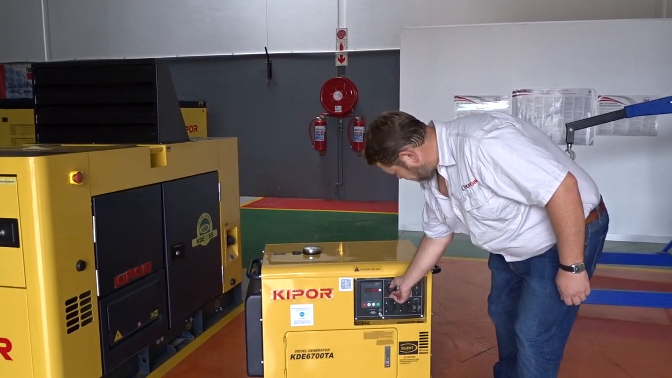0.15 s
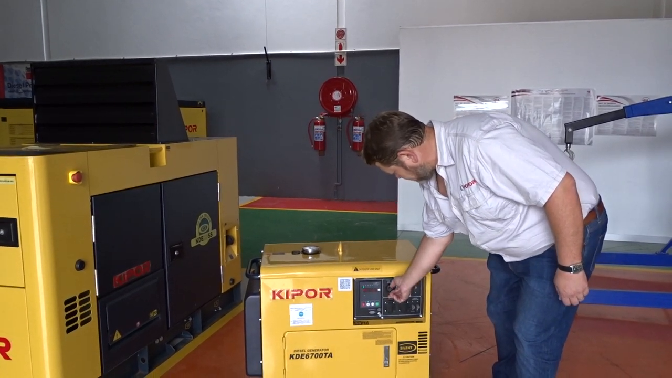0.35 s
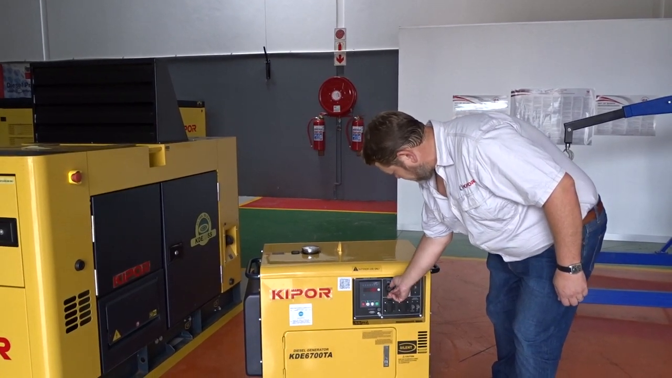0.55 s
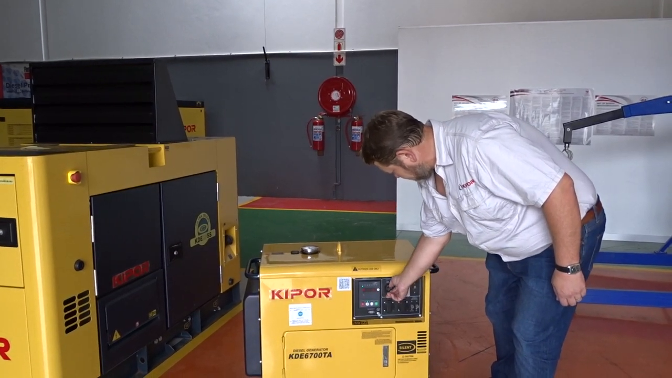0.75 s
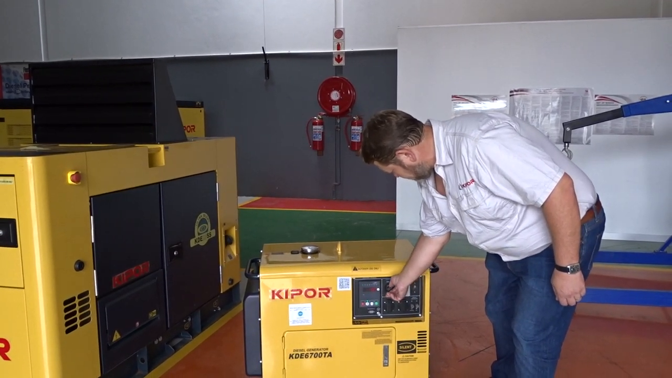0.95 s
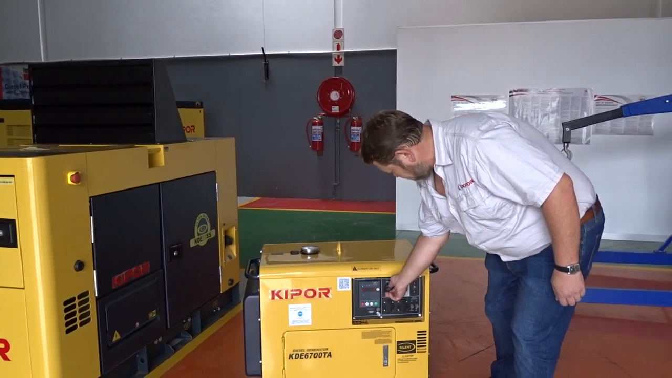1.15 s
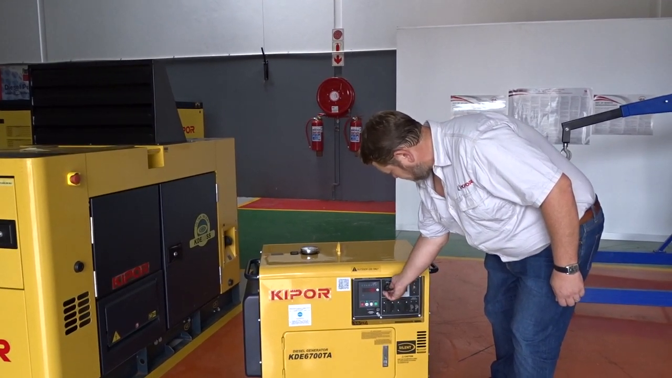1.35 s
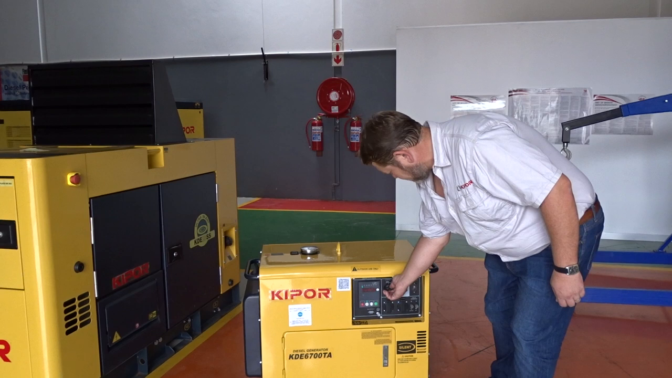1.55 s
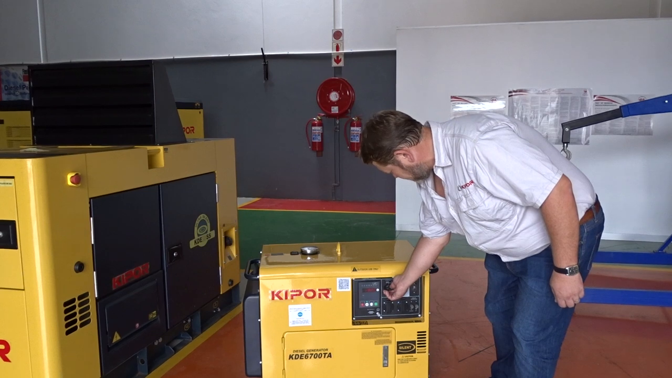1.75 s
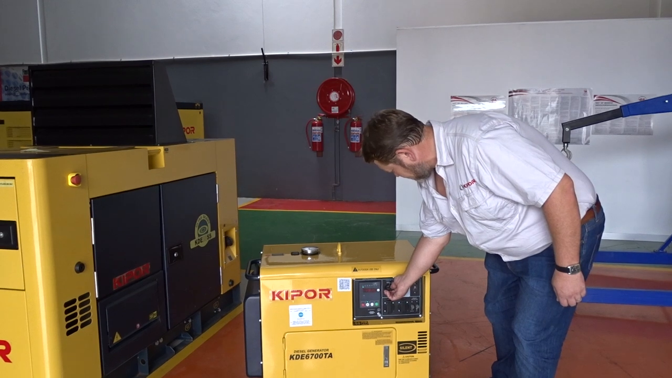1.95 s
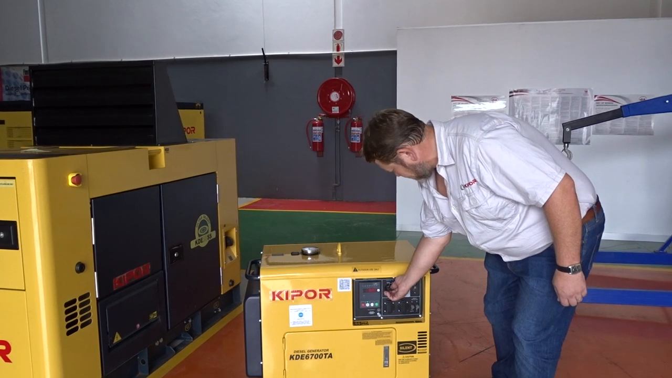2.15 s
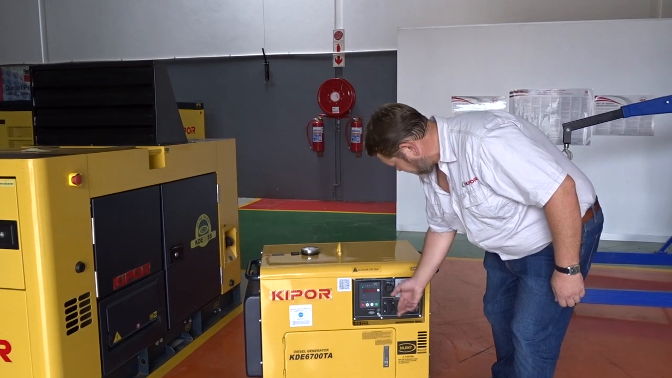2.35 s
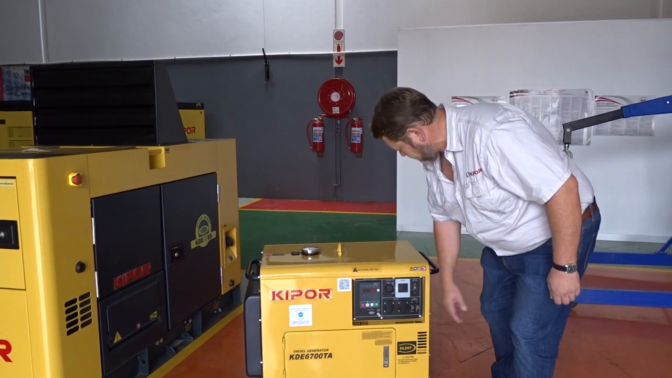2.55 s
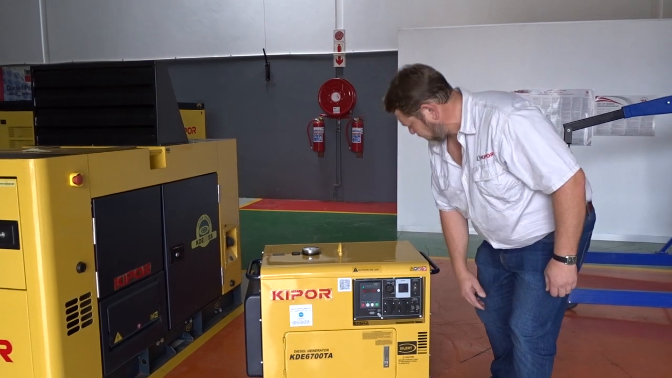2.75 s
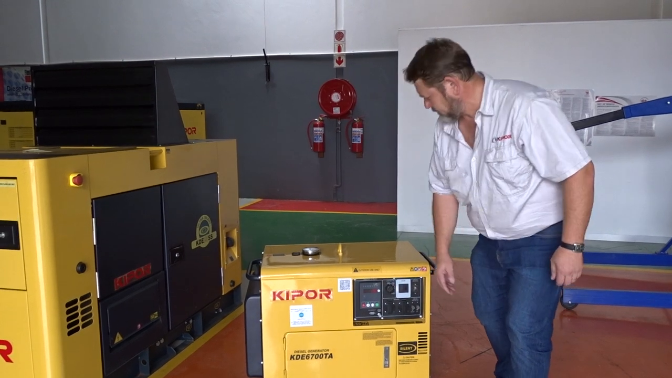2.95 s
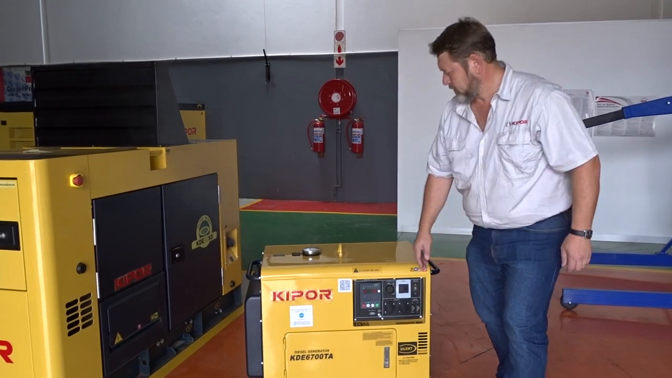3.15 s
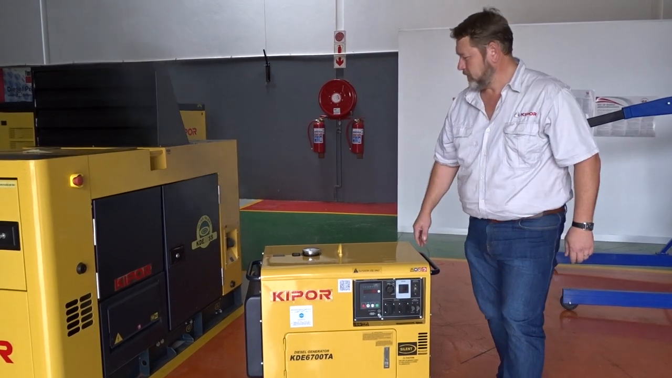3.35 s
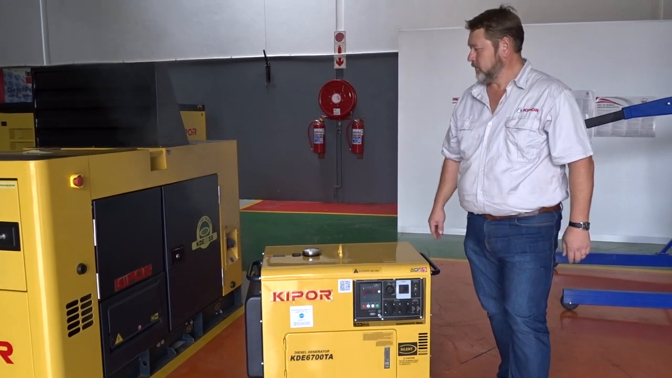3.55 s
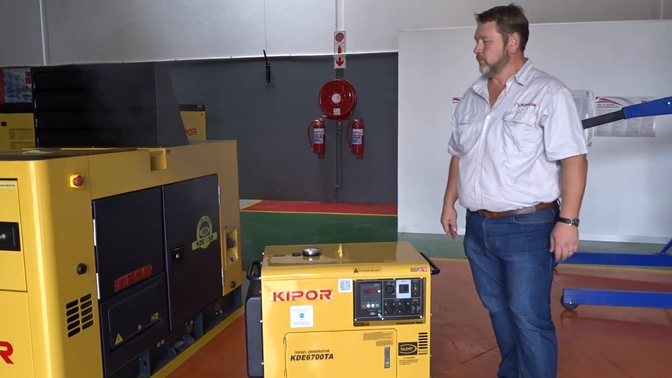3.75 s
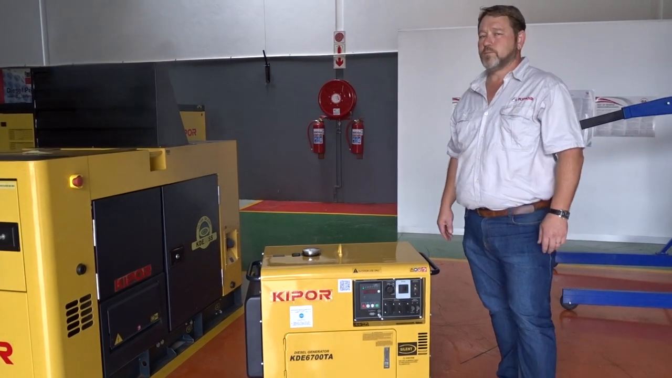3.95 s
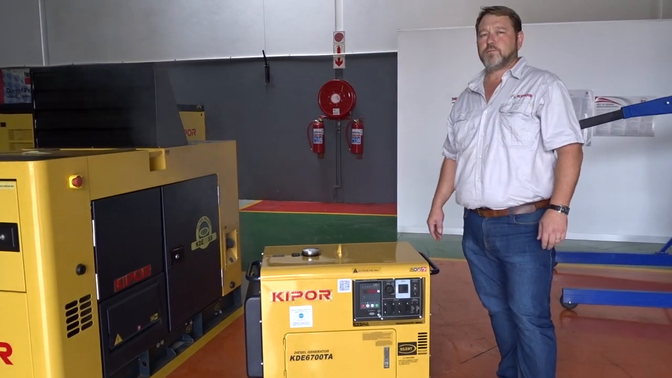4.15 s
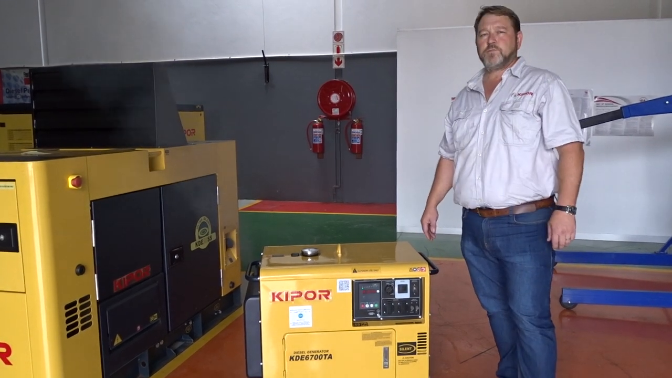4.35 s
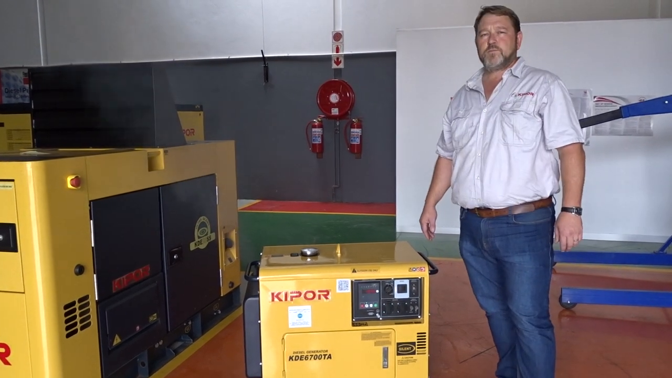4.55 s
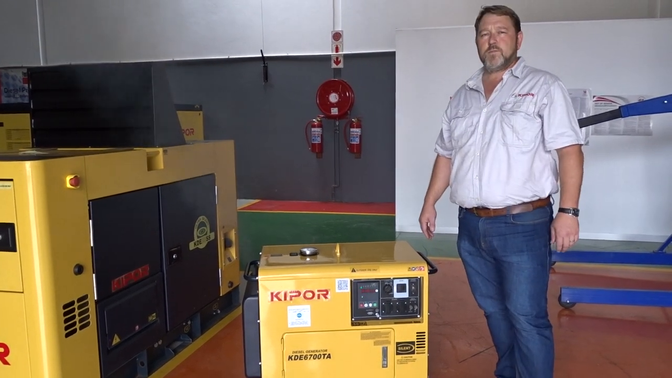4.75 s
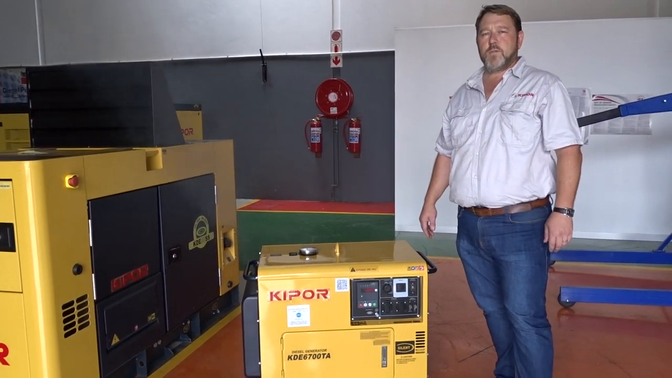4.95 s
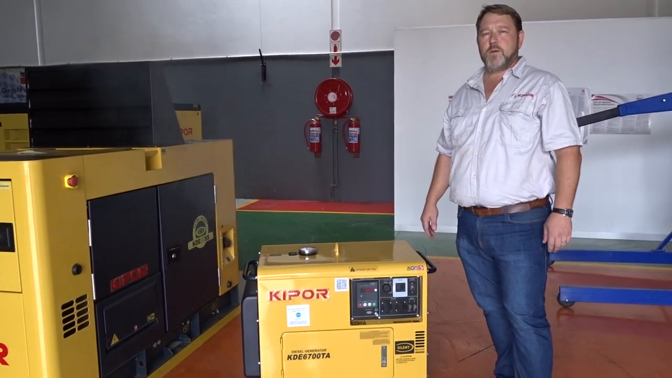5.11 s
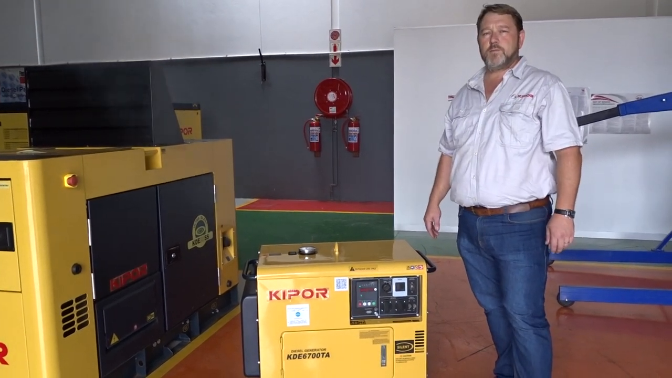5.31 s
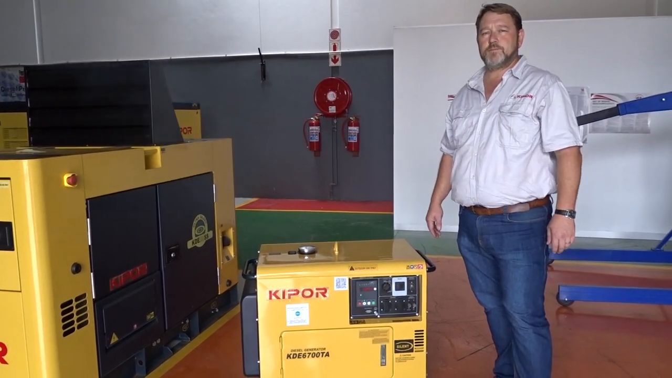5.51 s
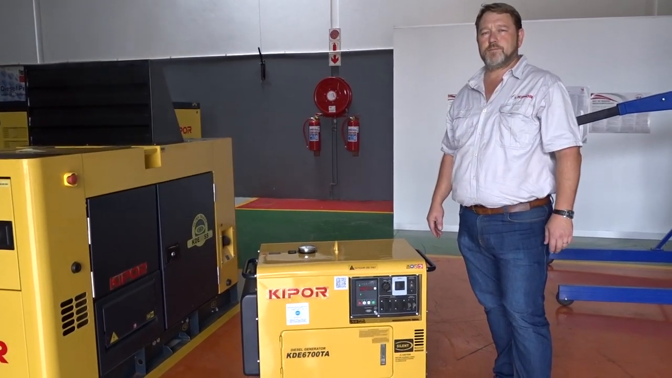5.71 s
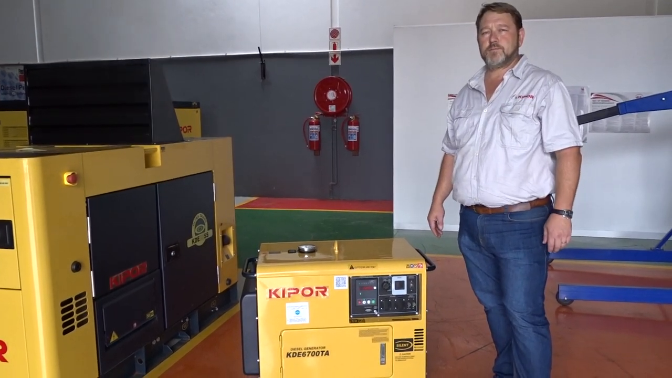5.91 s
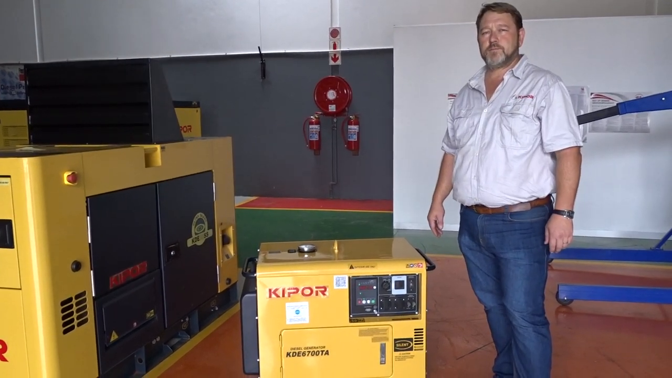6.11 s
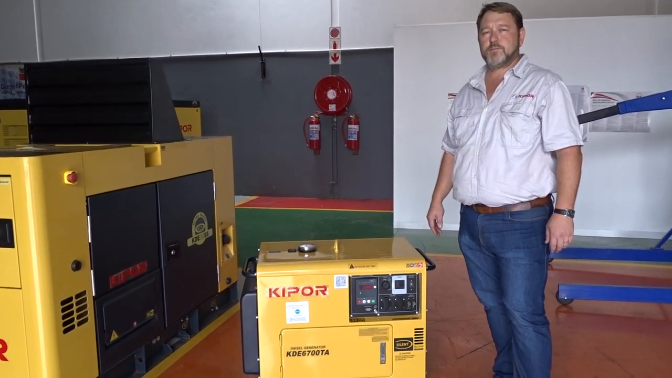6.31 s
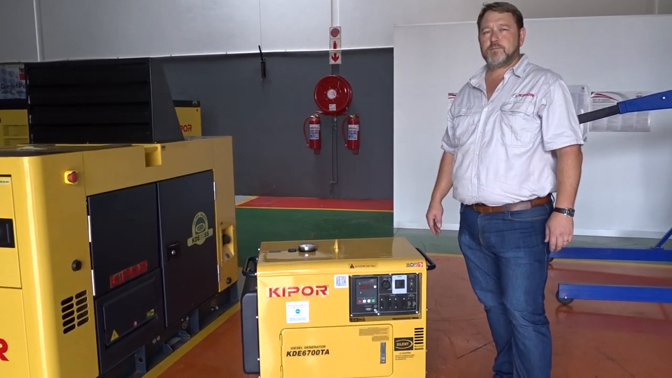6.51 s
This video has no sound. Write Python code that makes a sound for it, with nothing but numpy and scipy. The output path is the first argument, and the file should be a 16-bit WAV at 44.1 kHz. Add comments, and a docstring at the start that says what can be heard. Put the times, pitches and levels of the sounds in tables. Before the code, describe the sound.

A stereo microphone faces a small steel-cased diesel generator indoors. After over a second of near-quiet with a light rub and key clicks, the electric starter bites and rasps on its gear. Heavy first combustion thumps shake the case; separate knocks crowd together as speed climbs, with sheet metal ringing and loose panels slapping. The engine then holds constant speed, droning and rattling, with short wall reflections.

```python
"""In a workshop, the stereo microphone faces a small single-cylinder diesel generator in a steel case.
After a faint squeak and the snap of key contacts, the starter clashes in and grinds on the ring gear.
The engine fires and knocks its way up to speed while its cover buzzes and slaps; it settles at 26 firings
a second, one panel ringing along. Noise through resonances and spectra makes the metal; cosines make the
exhaust hum; filtered noise bursts throw the sound back from the walls."""
import sys
import numpy as np
from scipy import signal
from scipy.fft import rfft, irfft, next_fast_len
from scipy.io import wavfile
from scipy.ndimage import uniform_filter1d

SR = 44100
rng = np.random.default_rng(int(sys.argv[2]) if len(sys.argv) > 2 else 0)


def store_pcm(level_fs):
    """Save levels as 16-bit WAV."""
    pcm = np.round(np.clip(level_fs, -1, 1) * 32767).astype(np.int16)
    wavfile.write(sys.argv[1], SR, np.atleast_2d(pcm).T)


N = 294147
T = np.arange(N) / SR

# engine speed from the first firing until the governor holds it (time [s], rate [firings per second])
SPEED = [(2.058, 5.36), (2.39, 6.458), (3.01, 13.103), (3.43, 16.732), (4.58, 25.363), (4.83, 26.345),
         (5.29, 26.167), (6.67, 26.014)]
FIRED_S = SPEED[0][0]
# fuel rack: well open for the run-up, cut back by the governor, then eased open again
# (time [s], fuel [share of full])
FUEL = [(4.45, 0.76), (4.88, 0.024), (5.35, 0.15), (6.35, 0.17)]
# blows on the block: combustion crack, its ringing on, injector and tappet, piston slap, valves closing
# (place [share of cycle], level [dB], decay [s], growth [power of speed], rise at full fuel [dB])
STROKES = [(0.985, -7.5, 0.009, 0.4, 4), (.02, -10.5, 0.057, -0.54, 8), (.27, -5.5, 0.013, 1.6, 2),
           (.5, -10.5, 0.008, 1, 2.5), (.66, -2, 0.024, 1.5, -1.5)]
# spectrum of the block's clatter (frequency [Hz], level [dB])
CLATTER = [(1200, -19), (1700, 1.5), (2030, 5), (2280, 2.5), (2500, 3.5), (3200, -0.5), (4000, -4.5),
           (5000, -10), (6500, -19.5)]
# spectrum of the bright ticks of injector and valves (frequency [Hz], level [dB])
TICK = [(1500, -44), (3000, -5.5), (4200, -3.5), (5200, -0.5), (6300, 1.5), (7500, 3.5), (8600, 3),
        (9800, -1), (11000, -7)]
# pinion teeth passing the ring gear (time [s], rate [teeth per second])
MESH = [(1.36, 240), (1.5, 630), (1.65, 1040), (1.79, 1210), (1.95, 1270), (2.06, 1390), (2.55, 1380)]
# modes of the cover, as it buzzes and slaps (frequency [Hz], width [Hz], level [dB])
COVER_MODES = [(718, 128, 8), (1037, 140, 3), (1285, 166, 3.5), (1580, 67, 3.5)]

# starter motor switched on, pinion home in the ring gear, pinion out [s]
START_S, ENGAGED_S, RELEASE_S = 1.378, 1.473, 2.444
START_RISE_S = 0.0088
SHAKE_BUILD_S = 0.33  # the cover's buzz and the panel's shaking take this long to build after the first firing


def amp(db):
    """Gain from decibels."""
    return 10 ** (np.asarray(db) / 20)


def unit(x):
    """Scales x to an RMS of one."""
    return x / np.sqrt(np.mean(x ** 2) + 1e-20)


def noise():
    """White noise of unit level."""
    return rng.standard_normal(N)


def curve(rows, time=T):
    """Straight lines between (time [s], value) points."""
    return np.interp(time, *np.transpose(rows))


def gate(start, rise, stop=np.inf, fade=1):
    """Exponential attack up to start, hold, and exponential release from stop on."""
    return np.exp(-np.maximum(start - T, 0) / rise - np.maximum(T - stop, 0) / fade)


def level(rows):
    """Gain from a curve of (time [s], level [dB]), rising out of silence just before its first point."""
    return amp(curve(rows)) * gate(rows[0][0], .003)


def smooth(x, seconds):
    """One-pole lag."""
    r = np.exp(-1 / (seconds * SR))
    return signal.lfilter([1 - r], [1, -r], x)


def drift(per_s):
    """Slow chance of unit size, heading for a new value so many times a second."""
    return unit(np.interp(T * per_s, np.arange(1024), rng.standard_normal(1024)))


def gritty(grit_db):
    """Noise that comes in clumps a millisecond or two long, like small parts chattering."""
    clumps = unit(uniform_filter1d(noise(), size=70))
    return unit(noise() * amp(grit_db * clumps))


def colour(x, points):
    """Filters x by a spectrum of (frequency [Hz], level [dB]) points, joined along log frequency."""
    hz, db = np.transpose(points)
    size = next_fast_len(N + 8192)
    f = np.fft.rfftfreq(size, 1 / SR)
    gain = amp(np.interp(np.log(f + 1), np.log(hz + 1), db))
    return irfft(rfft(x, size) * gain, size)[:N]


def resonate(x, hz, width_hz):
    """One resonance of gain 1."""
    r = np.exp(-np.pi * width_hz / SR)
    return 2 * signal.lfilter([1 - r], [1, -r * np.exp(2j * np.pi * hz / SR)], x).real


def resonate_twice(x, hz, width_hz, skirt_hz):
    """Two resonances in a row at one pitch, for steeper sides."""
    return resonate(resonate(x, hz, width_hz), hz, skirt_hz)


def ring(x, modes):
    """A set of steep-sided resonances, together at unit level."""
    return unit(sum(amp(db) * resonate_twice(x, hz, 1.3 * width, 1.1 * width) for hz, width, db in modes))


def burst(decay, rise=0.0015):
    """Dense random ringing of unit energy that builds quickly and dies away."""
    t = T[:SR // 2]
    x = rng.standard_normal(len(t)) * np.exp(-t / decay) * (1 - np.exp(-t / rise))
    return x / np.linalg.norm(x)


def room(x, decay=0.18):
    """Reflections of the workshop, arriving 200 samples after the direct sound."""
    return signal.oaconvolve(x, np.r_[np.zeros(200), burst(decay)])[:N]


def crank():
    """Firing rate and the count of engine cycles since the first firing."""
    rate = curve(SPEED)
    return rate, np.cumsum(rate * (T >= FIRED_S)) / SR


def blows(share):
    """One impulse each time the engine passes this point of its cycle; slow strokes are heavier."""
    rate, turns = crank()
    return np.diff(np.ceil(turns - np.clip(share, 0, .999)), prepend=0) / np.sqrt(rate)


def running(x):
    """Scales x to unit level over the time the engine runs."""
    return x / np.sqrt(np.mean(x[T > FIRED_S] ** 2))


def building(seconds):
    """Gain that climbs from nothing at the first firing to one."""
    return np.clip((T - FIRED_S) / seconds, 0, 1)


def effort(db, db_per_doubling, top_rate, fuel_db):
    """Gain of an engine voice: db without fuel at top_rate [firings per second], where growth levels off."""
    doublings = np.minimum(np.log2(crank()[0] / top_rate), 0)
    # fuel_db is the rise at full fuel
    return amp(db + db_per_doubling * doublings + fuel_db * curve(FUEL)) * gate(FIRED_S, 0.0035)


def air():
    """The steady background of the workshop: noise filtered by one spectrum."""
    # spectrum of the background (frequency [Hz], level [dB])
    air_spectrum = [(15, -34), (25, -12), (48, -7), (96, -5.5), (124, -10.5), (235, -1), (267, -7),
                    (296, -4), (353, -9.5), (531, -6), (1060, -9.5), (1630, -20), (3500, -32), (4290, -36),
                    (11000, -44), (14300, -78), (22000, -120)]
    return amp(-51.5) * unit(colour(noise(), air_spectrum))


def squeak(start=.72, stop=1.0, db=-79, hz=4300, width_hz=500):
    """Something rubs faintly while a hand takes hold of the key: a narrow band of noise."""
    return amp(db) * unit(resonate_twice(noise(), hz, width_hz, width_hz)) * gate(start, .06, stop, fade=.12)


def key():
    """Small contacts snap as the key is turned: bands of noise that start at once and die away."""
    # key and solenoid contacts (time [s], level [dB], centre [Hz], width [Hz], decay [s])
    clicks = [(1.25, -57, 8600, 1760, 0.012), (1.285, -67, 8500, 2200, 0.017),
              (1.337, -52, 5630, 6000, 0.058)]
    out = np.zeros(N)
    for s, db, hz, width_hz, decay in clicks:
        snap = unit(resonate_twice(noise(), hz, width_hz, width_hz))
        out += amp(db) * snap * (T >= s) * np.exp(-abs(T - s) / decay)
    return out


def singing(hz=1102, width_hz=20, stiff=0.51):
    """A plate by the starter sings as the motor shakes it; its fixings limit how far it swings."""
    # level of the singing plate (time [s], level [dB])
    singing_level = [(1.375, -30), (1.48, -40), (1.58, -31.5), (1.7, -46), (1.92, -44), (1.98, -36),
                     (2.1, -38), (2.5, -43)]
    plate = unit(resonate_twice(noise(), hz, width_hz, width_hz))
    swing = abs(uniform_filter1d(plate ** 2, size=400)) + 0.023
    return unit(plate / swing ** stiff) * level(singing_level) * gate(START_S, START_RISE_S, RELEASE_S, fade=.03)


def starter(scrape=0.29, whine_db=-11.5):
    """The motor shakes its mount as it takes the load; pinion teeth scrape and ring the flywheel gear."""
    # spectrum of the motor rumble (frequency [Hz], level [dB])
    motor_spectrum = [(24, -63), (40, -24), (102, -9), (166, -9), (342, 1), (512, -5), (566, -0.5),
                      (615, -5.5), (832, -6), (1110, -6.5), (1220, -13.5), (2200, -23), (2860, -45),
                      (4840, -120)]
    # modes of the motor mount (frequency [Hz], width [Hz], level [dB])
    mount_modes = [(344, 20, -6), (571, 22, -3.5), (732, 28, -6), (1103, 16, -2), (2890, 42, -15.5)]
    # spectrum of the tooth rasp (frequency [Hz], level [dB])
    rasp_spectrum = [(760, -52), (1300, -3), (1560, -5), (3550, -9.5), (3920, -9), (4570, -9.5),
                     (5630, -10), (6340, -14.5), (7460, -8.5), (9960, -15), (11300, -27), (14700, -59),
                     (22000, -120)]
    # modes of the ring gear (frequency [Hz], width [Hz], level [dB])
    gear_modes = [(2907, 39, -3), (3900, 70, 1), (3930, 210, 4), (5050, 72, 0), (5730, 110, 0.5),
                  (7070, 130, -4.5), (10070, 160, -10)]
    unsteady = 1 + .013 * unit(uniform_filter1d(noise(), size=350))
    mesh_hz = curve(MESH) * unsteady
    teeth = np.cumsum(mesh_hz) / SR
    whine = unit(sum(np.cos(2 * np.pi * k * teeth) / k for k in range(2, 6)))
    pinion_turn = 1 + scrape * np.cos(2 * np.pi * teeth / 9)  # swells once in nine teeth
    grind = unit(noise() * pinion_turn * np.exp(-(teeth % 1)))
    motor = amp(-0.5) * unit(colour(noise(), motor_spectrum)) + amp(-6.5) * ring(noise(), mount_modes)
    contact = grind + amp(whine_db) * whine
    rasp = unit(colour(contact + 2.5 * room(contact), rasp_spectrum))
    chatter = amp(2.0 * drift(110))  # the teeth bounce in their backlash
    gear = ring(grind * chatter, gear_modes)
    motor_gain, rasp_gain, gear_gain = starter_load(mesh_hz)
    return motor * motor_gain + rasp * rasp_gain + gear * gear_gain


def starter_load(mesh_hz):
    """Gains of motor rumble (coasting once the engine fires), tooth rasp and ring gear (until pinion out)."""
    # compression strokes load the teeth (time [s], rise of the ring gear [dB])
    compressions = [(1.494, 1.5), (1.84, 7), (2.08, 3.5)]
    since = np.maximum(T - START_S, 0)
    # a surge of current dies away as the motor spins up
    motor = amp(-33 + 11.5 * np.exp(-since / 0.21)) * gate(START_S, START_RISE_S, FIRED_S, fade=1)
    # rasp grows 5 dB per doubling of the mesh rate, after one clash as the pinion is thrown in
    sliding = amp(-29.5 + 5 * np.log2(mesh_hz / MESH[-1][1]))
    clash = amp(-31) * np.exp(-since / 0.022)
    rasp = (sliding + clash) * gate(START_S, START_RISE_S, RELEASE_S, fade=0.38)
    squeeze_db = sum(db * np.exp(-((T - s) / 0.087) ** 2) for s, db in compressions)
    unload_db = 4 * np.maximum(T - FIRED_S, 0)  # 4 dB per second once the engine drives itself
    gear = amp(-35.5 + squeeze_db - unload_db) * gate(ENGAGED_S, 0.014, RELEASE_S, fade=0.03)
    return motor, rasp, gear


def catching(rise=0.01):
    """Fuel gathered during cranking burns at once and booms in the case: swells of filtered noise."""
    # the first, heavy firings shake the whole case (time [s], level [dB], decay [s])
    firings = [(2.054, -15, 0.11), (2.228, -20, 0.4)]
    # spectrum of the boom (frequency [Hz], level [dB])
    boom_spectrum = [(29, -41), (50, -11), (160, -4.5), (250, -1), (340, -1), (503, -2.5), (622, 2.5),
                     (821, -5.5), (891, -1), (967, -9.5), (1120, -11.5), (1400, -18), (2500, -15.5),
                     (3250, -19.5), (5500, -120)]
    swell = np.zeros(N)
    for s, db, decay in firings:
        since = np.maximum(T - s, 0)
        swell += amp(db) * (1 - np.exp(-since / rise)) * np.exp(-since / decay)
    return swell * unit(colour(noise(), boom_spectrum))


def knocks(spectrum, strokes, alike, wash, wet, length=1., uneven_db=2.0, rise=0.0094, gather=1., grit_db=0):
    """Each stroke rings the block partly alike and partly anew, over a wash of moving parts."""
    # uneven firing at first: strength of the blows (time [s], level [dB])
    stumble = [(2.23, -3), (2.39, -5), (2.54, -3), (2.655, 0), (2.76, -0.5), (2.95, -0.5), (3.09, 0.5),
               (3.17, 1), (3.48, 2.5), (4.1, 1.5)]
    out = np.zeros(N)
    speed = crank()[0] / SPEED[-1][1]
    fuel, stumble_db = curve(FUEL), curve(stumble)
    for share, db, decay, growth, fuel_db in strokes:
        strength_db = db + fuel_db * fuel + stumble_db + uneven_db * noise()
        hits = blows(share) * amp(strength_db) * speed ** growth
        envelope = np.sqrt(smooth(smooth(hits ** 2, decay * length / 2), rise))
        rattle = envelope * gritty(grit_db)
        same = signal.oaconvolve(hits, burst(decay * length))[:N]
        out += np.sqrt(alike) * same + np.sqrt(1 - alike) * rattle
    out = running(out)
    churn = wash * speed ** gather * gritty(grit_db)  # fan and gears fill the gaps as the speed rises
    return running(colour(out + wet * room(out) + churn, spectrum))


def block(first_s=0.019, thud_build_s=0.43):
    """Low thud and hollow bark of the case, clatter of the block, bright ticks of injector and valves."""
    # spectra of the thud and the bark (frequency [Hz], level [dB])
    thud_spectrum = [(15, -25), (25, -10), (55, -20), (90, -1), (125, -6.5), (165, -1), (220, -2.5),
                     (270, -3), (335, 0.5), (420, -6), (520, -5.5), (700, -40), (1200, -65)]
    bark_spectrum = [(330, -19), (470, 1.5), (540, 8), (640, 8), (740, 3.5), (860, 1), (1100, 3),
                     (1400, -0.5), (1650, -4), (2000, -15), (3000, -49)]
    # pushes of the engine on its mounts, then hollow blows in the case as the gas is let out
    # (place [share of cycle], level [dB], decay [s], growth [power of speed], rise at full fuel [dB])
    mount_strokes = [(.99, -5.5, .019, 0.42, 4.5), (.28, -8.5, 0.01, .4, 1.5), (.66, -2, 0.023, 0.81, -2)]
    gas_strokes = [(.6, -3, .011, 0.11, 3.2), (.83, 0.5, 0.0096, 0.39, -1.4),
                   (.05, -8.5, 0.021, -0.41, 0.74)]
    thud = knocks(thud_spectrum, mount_strokes, alike=0.53, wash=1.6, wet=2.16, length=0.9, gather=0.015)
    bark = knocks(bark_spectrum, gas_strokes, alike=0.37, wash=0.87, wet=0.87, length=0.91,
                  gather=0.041, grit_db=2.1, uneven_db=1.3)
    crisp = dict(length=.95, uneven_db=1.5, rise=.0035, grit_db=2.2)
    clatter = knocks(CLATTER, STROKES, alike=.3, wash=.22, wet=.3, gather=.7, **crisp)
    tick = knocks(TICK, STROKES, alike=.15, wash=.35, wet=.3, gather=1.3, **crisp)
    metal = bark * effort(db=-27, db_per_doubling=0.16, top_rate=50, fuel_db=5)
    metal += clatter * effort(db=-32.5, db_per_doubling=6, top_rate=12.5, fuel_db=7)
    metal += tick * effort(db=-37, db_per_doubling=1.5, top_rate=24, fuel_db=7.5)
    thud *= effort(db=-28.5, db_per_doubling=-4, top_rate=32, fuel_db=2)
    # the mounts take a while to start rocking
    return thud * building(thud_build_s) + metal * building(first_s)


def pings(width_hz=40, skirt_hz=160):
    """Every stroke rings small steel parts in a different mixture, so the clatter keeps changing colour."""
    # small steel parts struck by the valve gear (frequency [Hz], level [dB])
    steel_parts = [(1044, -43.5), (1093, -46), (1357, -49.5), (1410, -46.5), (1491, -49), (2089, -46),
                   (2471, -47.5), (5023, -53), (6105, -58), (6799, -58), (7531, -53), (9458, -66)]
    hits = sum(blows(share) * amp(db) for share, db, *_ in STROKES)
    out = np.zeros(N)
    for hz, db in steel_parts:
        strengths = rng.uniform(-1, 1, N) ** 3
        out += amp(db) * running(resonate_twice(hits * strengths, hz, width_hz, skirt_hz))
    return out * effort(db=0, db_per_doubling=3, top_rate=24, fuel_db=0)


def buzz(depth=0.26, share=0.56, critical_rate=11.1, spread=4.7, db=-27):
    """The cover chatters most at one share of each cycle, loudest near its critical rate [firings per s]."""
    rate, turns = crank()
    near_critical = np.exp(-((rate - critical_rate) / spread) ** 2) * building(SHAKE_BUILD_S)
    chatter = noise() * (1 + depth * np.cos(2 * np.pi * (turns - share)))
    return ring(chatter, COVER_MODES) * near_critical * amp(db)


def exhaust(waver_db=1.0, run_up_waver_db=1.5, stumble=0.003, build_s=1.4, load_lag_s=0.22):
    """Puffs of gas make a stack of clean orders, which glide up through the resonances of the silencer."""
    # exhaust and intake puffs, which set the phases of the orders (place [share of cycle], level [dB])
    puffs = [(0.063, 9), (0.328, 11.5), (0.57, 5), (.71, -1.5), (0.909, 5)]
    # orders at final speed (order [multiple of firing rate], level [dB], rise at full fuel [dB])
    orders = [(2, -15, 2), (3, -0.5, -0.5), (4, 3, -2), (5, -6.5, -7), (6, 0.5, -5), (7, -4, 8.5),
              (8, 1, -3), (9, -6, -2.5), (10, -9, 7), (11, -5.5, -0.5), (13, -11.5, 8.5), (14, -7.5, -2),
              (16, -5.5, -5), (18, -10, -3)]
    # how well silencer and case pass each frequency (frequency [Hz], gain [dB])
    silencer = [(15, -40), (45, -6), (65, -5), (78, 2.5), (90, 5.5), (105, 4.5), (128, -1.5), (152, 2.5),
                (175, 1.5), (210, 3), (300, 0.5), (500, 7)]
    # added level of the orders from the eleventh up (time [s], level [dB])
    upper_level = [(4.4, -4), (4.75, 2), (5.9, -1.5), (6.25, 5), (6.67, 2)]
    rate, turns = crank()
    unsettled = np.interp(T, [4.2, 4.9], [1, .1])  # firings are uneven until the governor holds the speed
    wander = unit(uniform_filter1d(uniform_filter1d(noise(), size=900), size=500))
    turns = turns + stumble * unsettled * wander
    fuel = curve(FUEL, T - load_lag_s)  # the exhaust answers the fuel rack late
    out = np.zeros(N)
    for k, db, fuel_db in orders:
        lead = np.angle(sum(amp(size) * np.exp(-2j * np.pi * k * share) for share, size in puffs))
        passed_db = curve(silencer, k * rate)
        upper_db = curve(upper_level) * (k >= 11)
        order_waver_db = (waver_db + run_up_waver_db * fuel) * drift(9)
        size_db = db + fuel_db * fuel + passed_db - passed_db[-1] + upper_db + order_waver_db
        out += amp(size_db) * np.cos(2 * np.pi * k * turns + lead)
    hum = out / np.sqrt(np.mean(out[-SR:] ** 2))  # unit level in the last second
    gain = effort(db=-18, db_per_doubling=8.5, top_rate=27, fuel_db=-2.5)
    return hum * gain * building(build_s)  # the puffs join into a hum


def growl(width_hz=96):
    """The engine overruns the starter, which growls on its mount: a gliding narrow band of noise."""
    # the growl (time [s], centre [Hz], level [dB])
    growl_glide = [(2.1, 341, -30), (2.27, 309.7, -37), (2.321, 325.8, -23), (2.42, 361.6, -27),
                   (2.51, 341, -25.5), (2.629, 309, -29), (2.85, 300, -93)]
    s, hz, db = np.transpose(growl_glide)
    turn = np.exp(2j * np.pi * np.cumsum(np.interp(T, s, hz)) / SR)
    lag = 1 / (np.pi * width_hz)
    slow_noise = smooth(smooth(noise() + 1j * noise(), lag), lag)
    shake = unit((turn * slow_noise).real)
    return shake * amp(np.interp(T, s, db)) * gate(s[0], 0.012, s[-1], fade=.1)


def panel(hz=559.2, width_hz=15.5, skirt_hz=42, rough=1.0, rough_steady=0.14, second_db=-4, stiff=0.36,
          surge_db=-0.8, uneven_db=1.0):
    """A sheet of the case, kicked twice a cycle, rings on; it surges in the run-up, then hums more evenly."""
    # level before the surging: loud in the run-up, a last swell as the governor catches
    # (time [s], level [dB])
    panel_level = [(2.2, -29), (2.39, -23.5), (2.65, -22.5), (2.77, -19), (2.88, -23), (3.2, -20),
                   (3.62, -21.5), (4.12, -21.5), (4.3, -25.5), (4.53, -21.5), (4.79, -22.5), (4.84, -25),
                   (4.86, -19), (4.95, -23), (5.1, -25), (6.67, -24)]
    kicks = (blows(.76) + amp(second_db) * blows(.44)) * amp(uneven_db * noise())
    shaking = np.interp(T, [4.4, 5.1], [rough, rough_steady]) * building(SHAKE_BUILD_S)
    drive = running(kicks) + shaking * noise()
    sheet = running(resonate_twice(drive, hz, width_hz, skirt_hz))
    swing = abs(uniform_filter1d(sheet ** 2, size=1700)) + 0.017  # its fixings limit how far it swings
    surge = amp(surge_db * drift(14) * curve(FUEL))
    return running(sheet / swing ** stiff) * level(panel_level) * surge


def hard_knocks(rise=0.0036, decay=0.015):
    """Now and then one cycle knocks harder, each time with its own share of case, clatter and tick."""
    # single hard firings (time [s], case level [dB], clatter level [dB], tick level [dB])
    hard_firings = [(2.651, -38, -33, -28), (2.754, -38, -31, -43), (2.852, -43, -28, -41),
                    (3.157, -34, -25, -27), (3.29, -36, -25, -40), (3.416, -34, -28, -28),
                    (3.475, -30, -29, -27), (3.533, -30, -29, -27), (3.752, -38, -26, -32),
                    (3.853, -30, -22, -25), (3.902, -31, -32, -32), (3.999, -24, -28.5, -33),
                    (4.044, -29, -34, -33), (4.481, -36, -39, -28), (4.6, -36, -30, -29.5),
                    (4.638, -34, -27, -28.5), (4.854, -30, -42, -42), (5.47, -27, -32, -31),
                    (5.673, -36, -34, -34), (5.735, -36, -36, -34), (5.995, -25, -40, -50),
                    (6.036, -25, -36, -42), (6.346, -36, -34, -44), (6.525, -30, -26.5, -32)]
    # modes of the case (frequency [Hz], width [Hz], level [dB])
    knock_modes = [(1125, 280, 7.5), (1500, 230, 4), (2070, 240, 5), (2470, 470, -2)]
    case = ring(noise(), knock_modes)
    clatter = unit(colour(gritty(3.1), CLATTER))
    tick = unit(colour(gritty(3), TICK))
    out = np.zeros(N)
    for s, case_db, clatter_db, tick_db in hard_firings:
        knock = amp(case_db) * case + amp(clatter_db) * clatter + amp(tick_db) * tick
        out += gate(s, rise, s, decay) * knock
    return out


def slap(share=.645, decay=0.026, rise=0.0016):
    """Shaken loose all at once, the cover strikes the case once a cycle and rings."""
    # level of the slapping (time [s], level [dB])
    slap_level = [(2.81, -28.5), (3.1, -28.5), (3.6, -31), (3.9, -38.5), (4.5, -33), (5.2, -41), (6.5, -33)]
    hits = blows(share) * amp(noise())
    strikes = np.sqrt(smooth(smooth(hits ** 2, decay / 2), rise)) * noise()
    return ring(strikes, COVER_MODES) * level(slap_level)


def scene():
    """The generator stands straight ahead; reflections from the walls spread it sideways."""
    # spectrum of the sideways sound, before a 1 dB cut (frequency [Hz], gain [dB])
    width = [(60, -18), (110, -20.5), (190, -18), (340, -13), (600, -13.5), (1080, -8), (1920, -7),
             (3420, -8.5), (6100, -10), (10900, -3.5)]
    starting = squeak() + key() + singing() + starter() + catching() + growl()
    engine = block() + pings() + buzz() + exhaust() + panel() + hard_knocks() + slap()
    mid = air() + starting + engine
    side = colour(room(mid, decay=0.028), width) * amp(-1.0)
    # the clatter lies a little to the right
    lean = 0.065 * colour(mid, [(500, -53), (1200, 1.5), (11000, 2.5)])
    return np.array([mid + side - lean, mid - side + lean])


def record(dry, ceiling=.62, edge_hz=11200):
    """The recorder rounds off the highest peaks, then cuts the treble above edge_hz."""
    rounded = dry / (1 + (dry / ceiling) ** 8) ** (1 / 8)
    lowpass = signal.firwin(601, edge_hz, window=("kaiser", 9), fs=SR)
    return signal.oaconvolve(rounded, lowpass[None], "same")


dry = scene()
out = record(dry)
store_pcm(out)
```